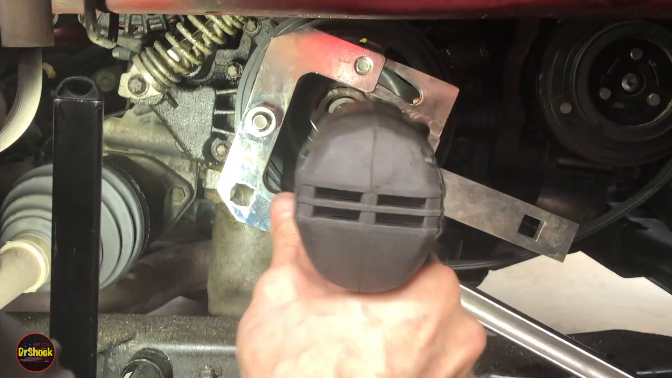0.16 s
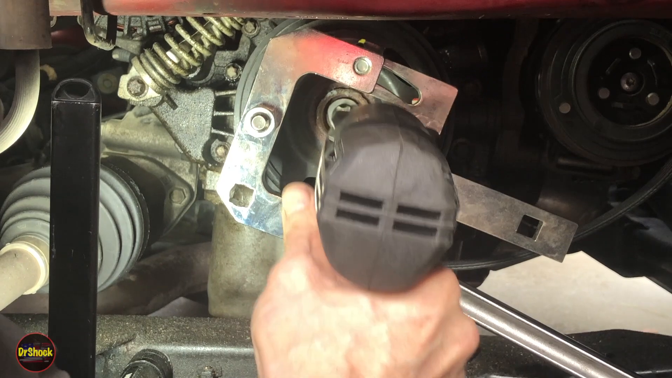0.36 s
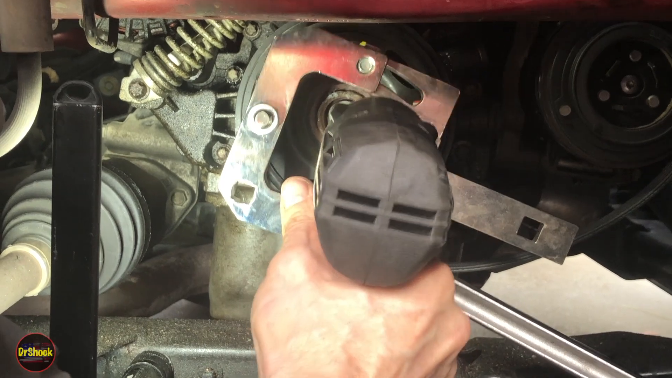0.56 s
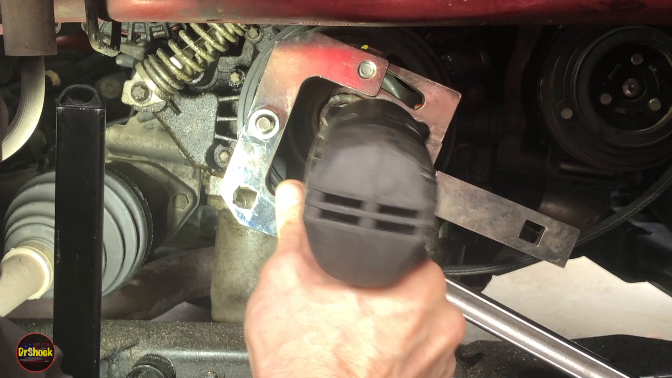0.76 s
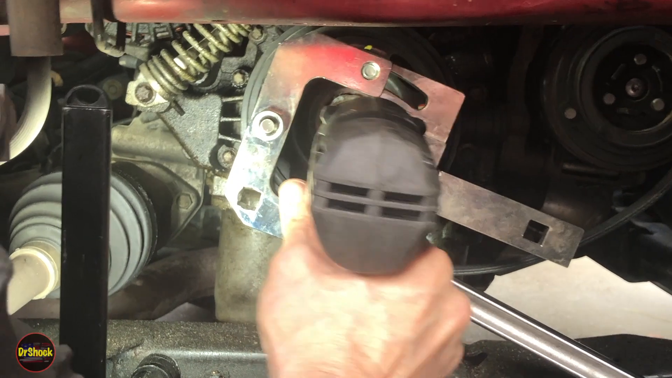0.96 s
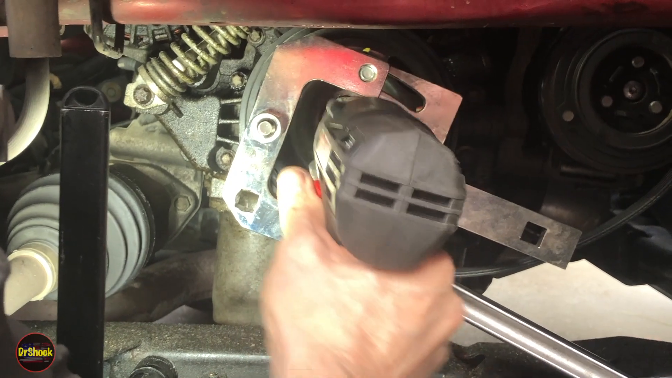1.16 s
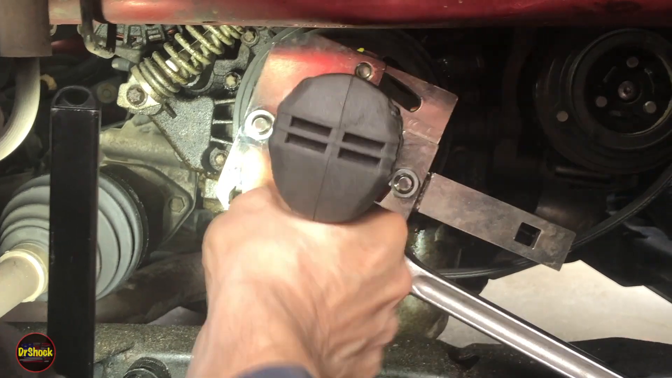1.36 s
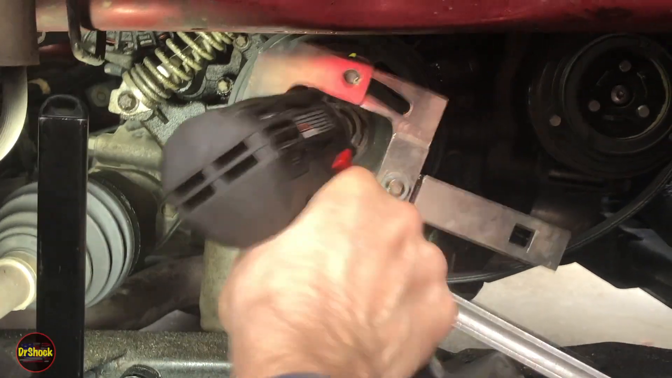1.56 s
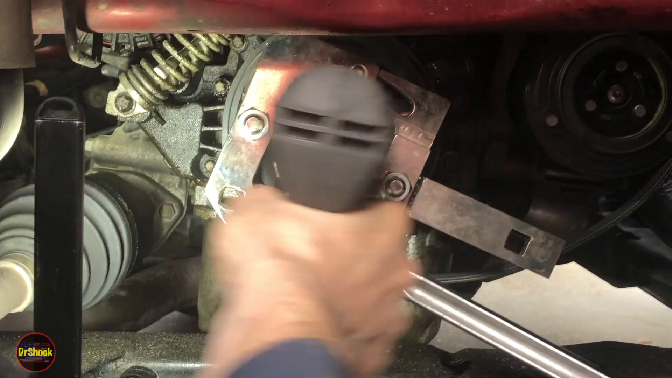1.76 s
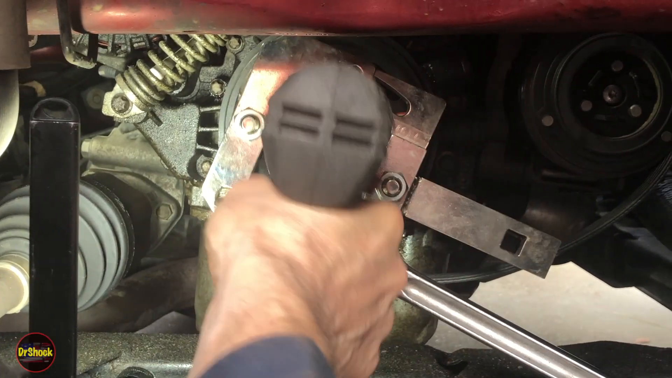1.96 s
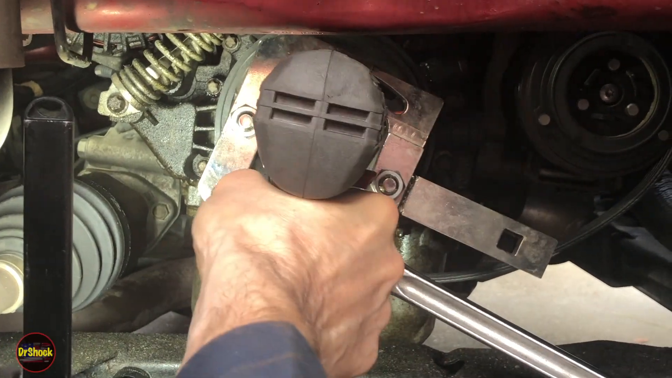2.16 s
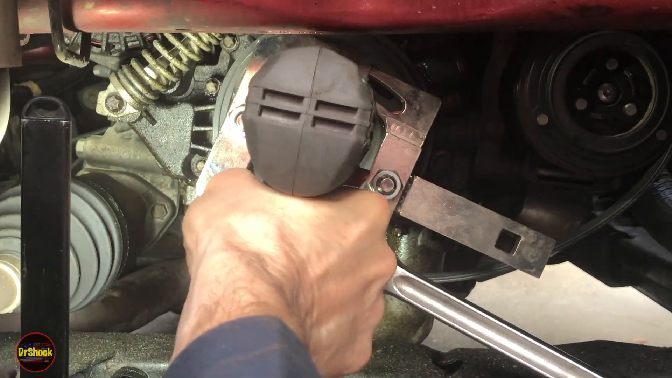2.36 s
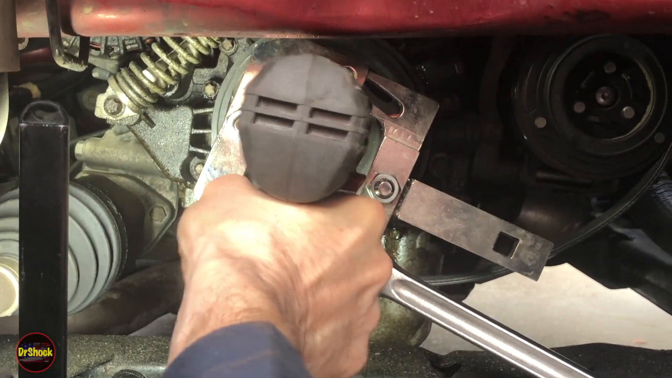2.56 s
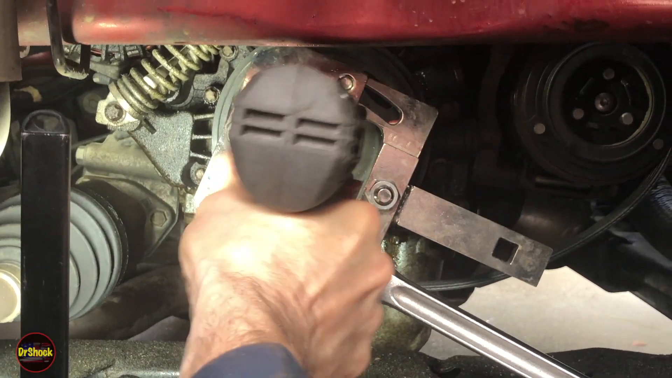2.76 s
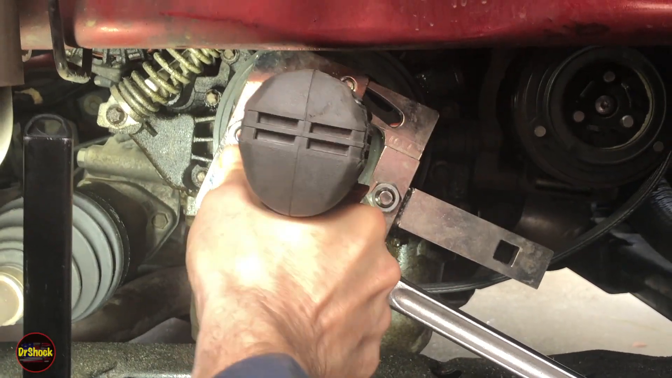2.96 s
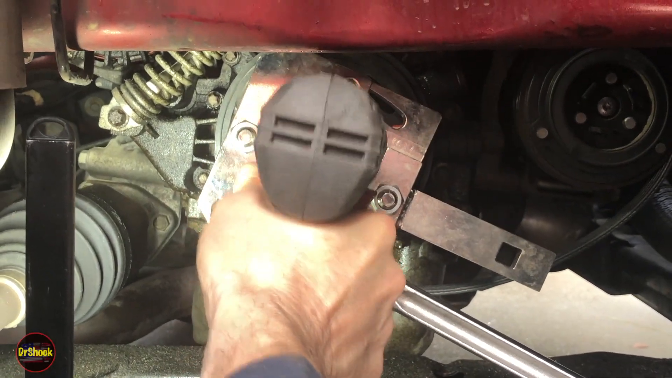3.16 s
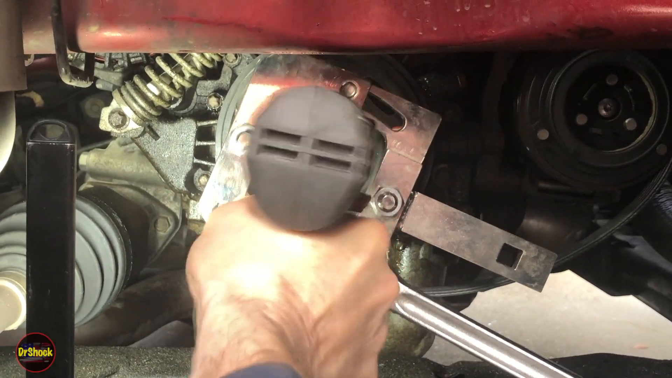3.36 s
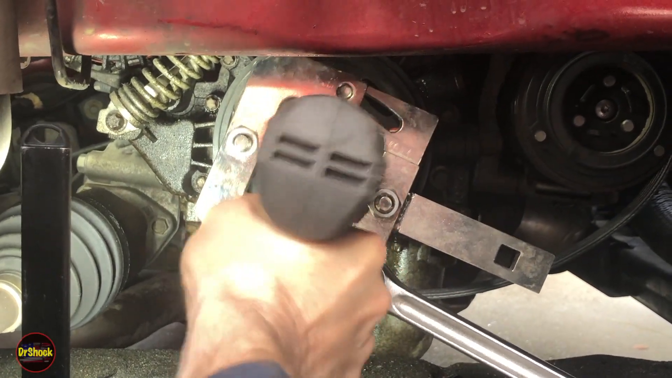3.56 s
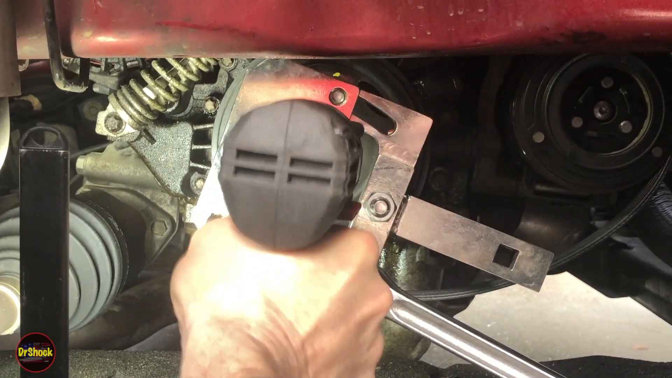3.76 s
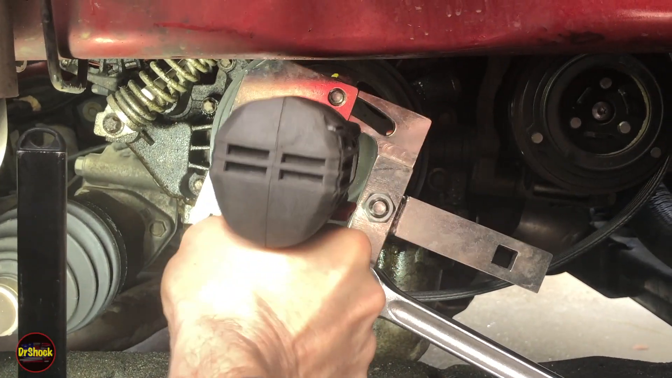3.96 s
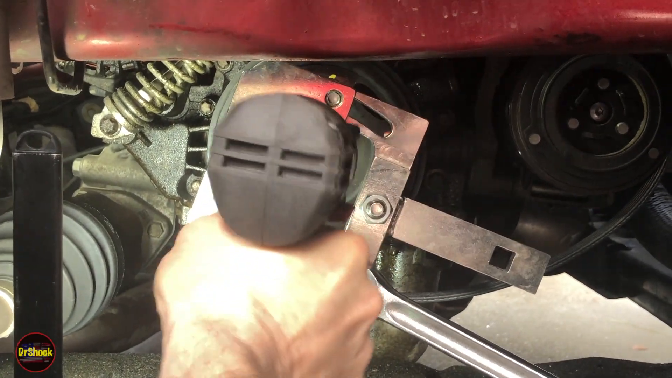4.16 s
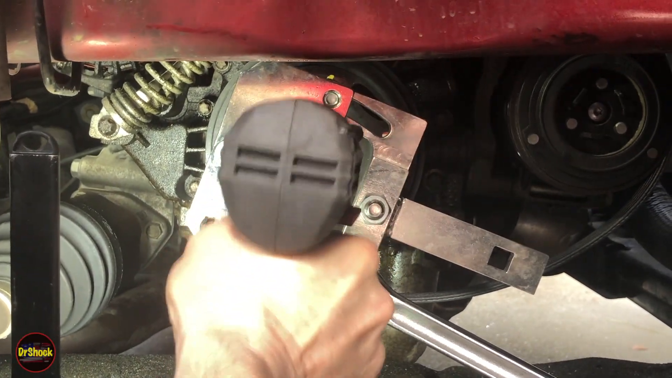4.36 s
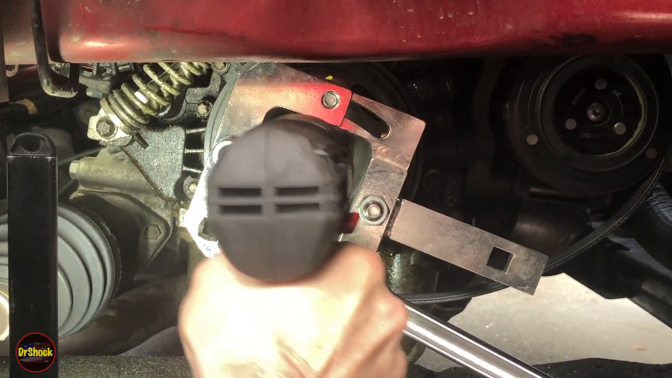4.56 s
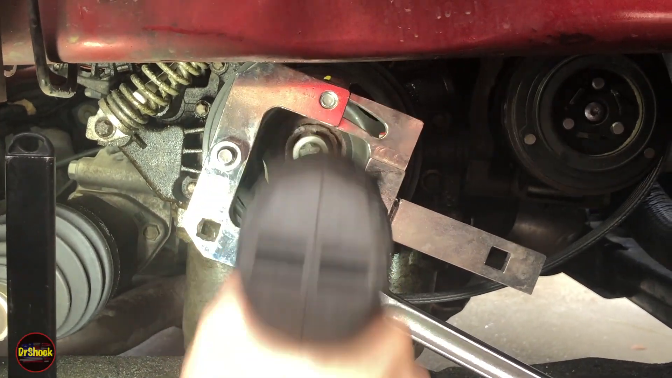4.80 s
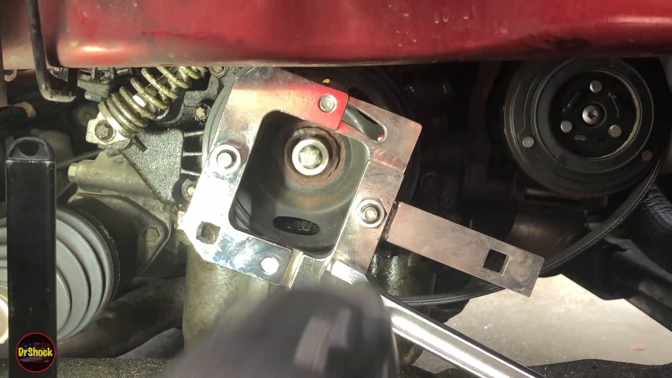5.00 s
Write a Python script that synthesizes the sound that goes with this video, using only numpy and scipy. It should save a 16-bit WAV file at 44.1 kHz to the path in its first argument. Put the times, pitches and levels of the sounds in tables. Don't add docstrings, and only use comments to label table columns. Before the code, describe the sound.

Socket knocks and sleeve rustle, then a cordless impact wrench hammers loose a bolt in a rapid burst, whines up, stops, and spins again.

```python
import sys
import numpy as np
from scipy import signal
from scipy.fft import rfft, irfft, next_fast_len
from scipy.io import wavfile
from scipy.ndimage import uniform_filter1d

SR = 44100
rng = np.random.default_rng(int(sys.argv[2]) if len(sys.argv) > 2 else 0)


def master(y):
    cut = np.clip(np.atleast_2d(y).T, -1, 1)
    pcm = np.round(cut * 32767)
    wavfile.write(sys.argv[1], SR, pcm.astype(np.int16))


def ratio_of_db(decibels):
    return 10 ** (np.asarray(decibels, float) / 20)


N = 221965

EDGES = 20 * 2 ** np.arange(0, 9.7, 1 / 3)
CENTRES = np.sqrt(EDGES[1:] * EDGES[:-1])
# start in seconds, peak in dB, loudest ring in Hz.
BLOWS = [(3.4083, -3, 2830), (3.434, 0.5, 1790), (3.4577, -0.5, 2400), (3.478, -1, 2840), (3.499, 1, 2910),
         (3.518, 1.5, 3660), (3.5385, -0.5, 5470), (3.559, -1.5, 4500), (3.5816, -2, 2700),
         (3.6033, -3, 2420), (3.6235, -2, 2860), (3.6435, -5, 1950)]
# motor bites [s], squeeze [dB per s], brake [s], rotor stops [s].
PULLS = [
    (3.408, 530, 3.876, 3.901),
    (4.03, 800, 4.503, 4.539),
]
# runs free from [s], share of top speed there [0-1], time constant [s].
SPINS = [
    (3.67, .7, .11),
    (4.03, .35, .069),
]


def rms_one(x):
    return x / np.sqrt(np.mean(x ** 2, axis=-1, keepdims=True) + 1e-20)


def at_hz(points, hz):
    table_hz, values = np.array(points)[:, 0], np.array(points)[:, 1]
    return np.interp(np.log(hz), np.log(table_hz), values)


def drift(rate, depth_db, count=1):
    r = np.exp(-80 * np.pi * rate / SR)
    noise = rng.standard_normal((count, N // 40 + 2002))
    smooth = signal.lfilter([1], [1, -2 * r, r * r], noise)[:, 2000:]
    slow = ratio_of_db(depth_db * rms_one(smooth))
    joined = slow[:, :-1, None] + np.diff(slow)[:, :, None] * np.arange(40) / 40
    return joined.reshape(count, -1)[:, :N]


def ring(clicks, hz, t60):
    r, w = ratio_of_db(-60 / (max(t60, .002) * SR)), 2 * np.pi * hz / SR
    return signal.lfilter([0, np.sin(w)], [1, -2 * r * np.cos(w), r * r], clicks + 1e-18)


def bank(source):
    bands = []
    for k, (low, high) in enumerate(zip(EDGES, EDGES[1:])):
        sos = signal.butter(2, [low, high], "band", fs=SR, output="sos")
        bands.append(signal.sosfilt(sos, source[k % 2]))
    return np.array(bands)


def coloured(bands, spectrum, patchy_db, rate):
    gains = ratio_of_db(at_hz(spectrum, CENTRES))
    heard = gains > gains.max() / 300
    flicker = drift(rate, patchy_db, count=heard.sum())
    return rms_one(gains[heard] @ (flicker * bands[heard]))


def add(out, bands, s, peak_db, band_db, t60, rise_s, crack=0):
    i = round(s * SR)
    t = np.arange(min(SR // 9, N - i)) / SR
    swell = 1 - np.exp(-t / (rise_s + 0.026 / CENTRES[:, None]))
    decay = np.exp(-np.log(1000) * t / t60[:, None])
    burst = ratio_of_db(band_db) @ (swell * decay * bands[:, i:i + len(t)])
    burst = burst * (1 + crack * np.exp(-t / 0.0017))
    out[i:i + len(t)] += ratio_of_db(peak_db) * burst / np.max(np.abs(burst))


def struck(table, modes, level_db, spread_db):
    at, out = [round(row[0] * SR) for row in table], np.zeros(N)
    peaks_db = np.array(table)[:, 1]
    chance = rng.standard_normal((len(at), len(modes), 2))
    for k, (hz, mode_db, t60) in enumerate(modes):
        strength = ratio_of_db(peaks_db + mode_db + level_db + spread_db * chance[:, k, 0])
        clicks = np.zeros(N)
        clicks[at] = strength * np.sign(chance[:, k, 1])
        out += ring(clicks, hz, min(t60, .085))
    return out


def parts(table):
    out, t = np.zeros(N), np.arange(SR // 8) / SR
    swell = 1 - np.exp(-t / .0008)
    for s, hz, level_db, t60 in table:
        i = round(s * SR)
        decay = ratio_of_db(level_db - 60 * t / max(t60, .005))
        out[i:i + len(t)] += decay * swell * np.sin(2 * np.pi * hz * t)
    return out * drift(160, 4.0)[0]


def sleeve():
    # start in seconds, held for seconds, rustle in dB,
    # swish above the rustle in dB.
    moves = [(0, 0.016, -61.5, 2), (.1, 0.2, -66, -2), (.4, 0.26, -76, -4), (.95, 0.011, -64, -9),
             (1.07, .3, -71.5, -16), (1.4, .01, -63.5, -4.5), (1.56, 0.15, -57.5, -22),
             (1.8, .55, -78.5, -2), (2.03, 0.067, -71.5, -5), (2.5, .75, -84, 2.5),
             (2.85, 0.0091, -71, -13), (3.298, .1, -74.5, -14.5), (4.5, 0.11, -63, -6),
             (4.9, 0.16, -60, -17)]
    swell_db_per_s, fade_db_per_s = 120, 199.5
    swish_rest_db = -81.5
    t = np.arange(N) / SR
    rustles, swishes = [], []
    for s, held, level_db, swish_above_db in moves:
        before, after = np.maximum(s - t, 0), np.maximum(t - s - held, 0)
        shape = level_db - swell_db_per_s * before - fade_db_per_s * after
        rustles.append(shape)
        swishes.append(shape + swish_above_db)
    return np.max(rustles, axis=0), np.max(swishes, axis=0).clip(swish_rest_db)


def background(bands):
    # frequency in Hz, level in dB per Hz.
    rumble_colour = [(12, -42), (20, -14), (70, -0.5), (145, -3), (250, -14.5), (528, -18.5), (1180, -26),
                     (1700, -38.5), (1920, -25), (2500, -34), (3250, -62), (5500, -120)]
    # frequency in Hz, level in dB per Hz.
    rustle_colour = [(180, -32.5), (300, -3), (730, -7.5), (975, -12), (1050, -10.5), (1820, -7.5),
                     (2260, -15), (2620, -11), (6000, -28.5), (7800, -48.5), (13200, -120)]
    # frequency in Hz, level in dB per Hz.
    swish_colour = [(2350, -27), (4000, -0.5), (6070, -10), (6470, -1), (7400, -4), (12400, -6.5),
                    (16000, -15.5)]
    hiss_db = -85
    rustle_db, swish_db = sleeve()
    rumble_db = -61 + 0.12 * np.maximum(rustle_db + 80.5, 0)
    rumble = ratio_of_db(rumble_db) * coloured(np.roll(bands, N // 3, axis=1), rumble_colour, 2.2, 8)
    moved, grain = np.roll(bands, N // 2, axis=1), drift(25, 0.5)[0]
    rustle = ratio_of_db(rustle_db) * coloured(moved, rustle_colour, 1.8, 14)
    swish = ratio_of_db(swish_db) * coloured(moved, swish_colour, 1.5, 15)
    return rumble + grain * (rustle + swish) + ratio_of_db(hiss_db) * rng.standard_normal(N)


def contacts(bands, table, rise_s, crack, ring_db):
    # frequency in Hz, level in dB per Hz.
    knock_colour = [(100, -16), (300, -17), (600, -8), (1500, 2.5), (3000, 4), (5000, 1), (9000, -3.5),
                    (16000, -11.5)]
    # frequency in Hz, time to fall 60 dB in seconds.
    knock_decay = [(300, 0.052), (790, 0.07), (2090, 0.04), (5510, 0.041)]
    plate_hz = 526
    out = np.zeros(N)
    treble = np.clip(np.log2(CENTRES / 3000), 0, 1)
    bass = np.clip(np.log2(1000 / CENTRES), 0, 1)
    click = np.arange(4000) == 0
    for s, peak_db, hz, weight, factor in table:
        treble_db, bass_db = -2 - 32.5 * weight, -32.5 + 33.5 * weight
        hollow_db = 5.5 * np.exp(-(np.log2(CENTRES / hz) / 0.48) ** 2)
        tilt_db = treble * (treble_db + 14.5) + bass * (bass_db + 24.5)
        colour_db = at_hz(knock_colour, CENTRES) + tilt_db + hollow_db
        t60 = at_hz(knock_decay, CENTRES) * np.clip(factor, .3, 4)
        add(out, bands, s, peak_db + 0.029, colour_db, t60, rise_s, crack)
        i = round(s * SR)
        out[i:i + 4000] += ratio_of_db(peak_db + ring_db) * ring(click, hz, .024)
        out[i:i + 4000] += ratio_of_db(peak_db + ring_db + bass_db - 0.5) * ring(click, plate_hz, 0.094)
    return out


def knocks(bands):
    # start in seconds, peak in dB, main ring in Hz,
    # weight from 0 thin to 1 heavy, length factor.
    scuffs = [(0.018, -46.5, 3330, 0.57, 4.8), (0.305, -44, 1920, 0.46, 0.86), (0.312, -51, 1060, 1, 0.65),
              (1.149, -29, 1600, 0.74, 1), (1.174, -41.5, 1570, 1, 2.5), (1.412, -46.5, 1430, 0.48, 2.8),
              (1.583, -25.5, 1500, 0.59, 1.9), (1.589, -25, 2700, 0.66, 3.1), (1.624, -40, 1640, 0.82, 3.4),
              (1.662, -28.5, 1240, 0.65, 1.6), (2.499, -52, 4020, .49, 1.3),
              (2.542, -48.5, 810, 0.57, 0.67), (2.718, -51.5, 1740, 0.35, 1.3),
              (3.997, -52.5, 4030, .4, 3.6), (4.009, -40.5, 2000, .6, 3)]
    # start in seconds, peak in dB, main ring in Hz, weight 0-1.
    grip_ticks = [(0.361, -51.5, 2230, 0.17), (0.554, -54.5, 1930, 0.86), (0.646, -56, 2240, 0.3),
                  (0.689, -55.5, 824, 1), (1.8, -55, 1850, .64), (1.994, -53.5, 566, 1.06),
                  (2.234, -58, 1010, 0.8), (2.259, -64, 630, 1), (2.324, -59.5, 958, 1),
                  (2.627, -57, 4030, 0.65), (2.648, -54.5, 4130, 0.4), (2.948, -61, 1780, .52),
                  (2.974, -54, 2670, 0.4), (3.199, -59, 2200, 0.3), (3.255, -58, 905, 0.5),
                  (4.691, -54, 1390, 0.5)]
    # start in seconds, peak in dB, main ring in Hz,
    # weight from 0 thin to 1 heavy, length factor.
    socket_knocks = [(0.95, -19, 2290, 0.64, 1.67), (1.106, -35.5, 4840, 0.49, 1.4),
                     (1.153, -30.5, 1930, 0.29, 1.8), (1.195, -33, 1520, 0.69, 2),
                     (1.313, -40.5, 1160, 0.95, 2.1), (1.6085, -13, 1170, 0.67, 1.3),
                     (1.712, -22.5, 1460, 0.63, 2), (1.746, -41, 1540, .98, 3.1),
                     (1.823, -50, 1800, 0.58, .66), (2.524, -42.5, 1570, 0.23, 2.4),
                     (2.826, -38.5, 1400, 0.48, 1.5), (2.873, -47.5, 1580, 0.58, 0.84),
                     (3.084, -31.5, 3060, 0.022, 1.2), (3.336, -48, 4200, 0.82, 1.4),
                     (3.355, -48.5, 4800, 1, 1.2)]
    # start in seconds, peak in dB, main ring in Hz, weight 0-1.
    grazes = [(1.016, -50.5, 1600, 0.95), (1.259, -57, 1700, .55), (1.386, -56, 2200, 0.4),
              (1.453, -57, 2100, 0.8), (1.468, -53, 2030, 0.76), (1.511, -52, 891, 1),
              (2.039, -64, 2500, 0.6), (2.079, -59, 1970, .55), (2.477, -54.5, 1790, 0.4),
              (2.736, -53, 1790, 0.84), (2.844, -72, 1500, .3), (3.104, -57, 840, 0.5)]
    # frequency in Hz, level in dB, time to fall 60 dB in seconds.
    socket_modes = [(917, -5.5, 0.028), (1361, -11.5, 0.068), (1520, 1, 0.053), (1790, -3.5, 0.052),
                    (2103, -5.5, 0.014), (2290, -3.5, 0.024), (2670, -6.5, 0.083), (2800, -5, 0.078),
                    (3240, -12.5, 0.035), (3600, -13.5, 0.045), (3800, -1, 0.041), (4140, -10, 0.043),
                    (4530, -12.5, 0.041), (5250, -4, 0.02), (5840, -17, .04), (6890, -17, 0.031)]
    tick_length, graze_length = 1.8, 1.4
    hard = socket_knocks + [row + (tick_length,) for row in grip_ticks]
    gliding = scuffs + [row + (graze_length,) for row in grazes]
    sharp = contacts(bands, hard, rise_s=.0004, crack=2.0, ring_db=-7)
    soft = contacts(bands, gliding, rise_s=.004, crack=0, ring_db=-20)
    rings = struck(hard, socket_modes, -21.0, 5.9) + struck(gliding, socket_modes, -22.0, 4.0)
    return sharp + soft + rings


def loose_parts():
    # start in seconds, pitch in Hz, level in dB,
    # time to fall 60 dB in seconds.
    knocked = [(.032, 3300, -52, .05), (.9503, 2720, -25, 0.016), (.951, 4900, -31.5, 0.033),
               (.951, 6140, -35, 0.032), (.951, 170, -43, 0.088), (1.107, 1685, -42, 0.028),
               (1.1065, 4880, -42, .015), (1.15, 2840, -43, .044), (1.154, 198, -47, 0.092),
               (1.196, 2350, -46, .04), (1.59, 4130, -33, .04), (1.59, 5300, -38, .04),
               (1.609, 3000, -21.5, 0.028), (1.609, 1700, -24, 0.022), (1.667, 2290, -36, .06),
               (1.665, 3630, -43, 0.079), (1.713, 975, -33, 0.077), (1.714, 2770, -37, .06),
               (1.714, 5190, -39, 0.045), (1.748, 2800, -52, .08), (1.75, 5250, -56, 0.05),
               (1.712, 1500, -29, 0.014), (2.075, 1960, -65, .1), (2.236, 900, -57.5, 0.035),
               (2.258, 600, -55, 0.045), (2.478, 1730, -61, 0.064), (2.628, 2550, -64, .08),
               (2.648, 3280, -66, .08), (2.718, 1750, -61, .07), (2.841, 1460, -54.5, 0.028),
               (2.841, 2600, -60, .03), (2.8735, 1620, -43, 0.026), (3.0845, 5020, -36.5, 0.017),
               (3.0845, 6920, -43, 0.018), (3.085, 9450, -44, 0.024), (3.086, 2480, -39, 0.018),
               (3.324, 1710, -57, 0.014), (3.336, 4113, -53.5, .012), (3.355, 4860, -50.5, .02),
               (3.879, 5400, -25.5, 0.04), (3.887, 4340, -23, 0.053), (3.886, 2520, -27, .04),
               (3.932, 3620, -60, .2), (3.085, 1610, -45.5, 0.028), (4.503, 3300, -23.5, 0.032),
               (4.501, 1760, -22.5, 0.032), (4.513, 5000, -29, 0.033), (4.504, 9530, -22, .04),
               (4.526, 1710, -31.5, 0.037), (4.535, 2490, -27, 0.038)]
    # start in seconds,
    # pitch in Hz, # level in dB, time to fall 60 dB in seconds.
    motor_rings = [(3.372, 2800, -50, .2), (3.368, 1500, -54.5, .2), (4.012, 2500, -48.5, .1),
                   (4.03, 2520, -27, 0.096), (4.034, 1750, -34, .06), (4.056, 2300, -38, .06),
                   (4.056, 4700, -29, .07), (4.066, 5150, -29, 0.054), (4.082, 5600, -35, .05),
                   (4.158, 4900, -38, .06), (4.502, 12000, -28, .04), (4.172, 13200, -34, .02),
                   (3.674, 10500, -28, .02)]
    return parts(knocked + motor_rings)


def chopper():
    # on in seconds, off in seconds, level in dB.
    touches = [
        (2.515, 2.655, -70),
        (3.336, 3.366, -71),
        (3.932, 3.991, -84),
    ]
    switch_hz = 7380
    t, on = np.arange(N) / SR, 0
    for start, stop, level_db in touches:
        times = [start, .6 * start + .4 * stop, stop, stop + 0.0038]
        on = on + ratio_of_db(level_db) * np.interp(t, times, [0, 1.4, 0.41, 0.033])
    tone = np.sin(2 * np.pi * switch_hz * t) + ratio_of_db(-19) * np.sin(4 * np.pi * switch_hz * t)
    return on * drift(12, 2.5)[0] * tone


def hammer(bands):
    # start in seconds, peak in dB, loudest ring in Hz.
    cam = [(3.3938, -17, 2535), (3.400, -8, 1520), (3.405, -4, 2850), (3.4201, -9.5, 1592),
           (3.428, -6, 1620), (3.445, -8.5, 1594), (3.4726, -7, 2790), (3.4846, -8, 2848),
           (3.493, -6, 1767), (3.512, -9, 1600), (3.530, -8, 1583), (3.5516, -5, 1607), (3.566, -8, 2600),
           (3.576, -12.5, 1600), (3.587, -8, 3013), (3.597, -11, 2300), (3.61, -10, 1997),
           (3.618, -7, 2394), (3.6368, -5.5, 1820), (3.650, -10.5, 2440), (3.659, -14, 1600),
           (3.672, -11.5, 2806), (3.684, -21.5, 2820)]
    # frequency in Hz, level in dB,
    # time to fall 60 dB in seconds.
    steel = [(507, -16, .08), (1300, -16, 0.078), (1535, -6, .06), (1629, -3.5, 0.095), (1778, -1.5, 0.093),
             (1995, -9, 0.052), (2375, -1.5, .06), (2650, -3.5, 0.07), (2840, 2.5, 0.071),
             (3184, -10, 0.054), (3680, -3, .06), (4400, -6, 0.074), (5470, -11, 0.037), (11000, -6, .03)]
    # frequency in Hz, level in dB per Hz.
    blow_colour = [(15, -38), (25, -7.5), (74, -7), (161, -12.5), (242, -7.5), (354, -23.5), (503, -4),
                   (1130, -7), (1650, 2), (2840, -2.5), (3430, -6.5), (3720, -0.5), (6560, -9.5),
                   (11300, -9), (16000, -18)]
    # frequency in Hz, time to fall 60 dB in seconds.
    blow_decay = [(30, .1), (300, .085), (1500, .057), (4000, .056), (10000, .07)]
    out = struck(BLOWS, steel, -15, 4.0) + struck(cam, steel[1:10], -16, 4.0)
    treble = np.clip(np.log2(CENTRES / 3500), 0, 1)
    colour_db, decay = at_hz(blow_colour, CENTRES), at_hz(blow_decay, CENTRES)
    for s, peak_db, _ in BLOWS:
        treble_db = 0.5 - 10 * (s - BLOWS[0][0])
        add(out, bands, s, peak_db + 6.5, colour_db + treble * treble_db, .75 * decay, rise_s=.0006)
    for s, peak_db, _ in cam:
        dull_db = max(18.5 - 60.5 * (s - cam[0][0]), 6.0)
        add(out, bands, s, peak_db, colour_db - dull_db * treble, .45 * decay, rise_s=.0008)
    ring_s = .022
    blow_rings = parts([(s, hz, peak_db - 6, ring_s) for s, peak_db, hz in BLOWS])
    cam_rings = parts([(s, hz, peak_db - 4, ring_s) for s, peak_db, hz in cam])
    return out + blow_rings + cam_rings


def rotor(pull, spin):
    top_mesh_hz, let_go_s, sag_hz = 3915, .05, 200
    brake = pull[2]
    free_from, start_share, time_constant = spin
    t = np.arange(N) / SR
    eased = np.clip((t - brake) / let_go_s + 1, 0, 1) ** 2
    missing = (1 - start_share) * np.exp(-np.maximum(t - free_from, 0) / time_constant)
    return 1 - missing - eased * sag_hz / top_mesh_hz


def effort(top_db, follows, shaken_db, stop_rate, echo_db, echo_rate, lag_s):
    first_share, grows_s, fade_s = .55, .1, 0.072
    t, out = np.arange(N) / SR, 0
    first, last = BLOWS[0][0], BLOWS[-1][0]
    shaken = np.interp(t, [first - .012, first, first + grows_s, last, last + fade_s],
                       [0, first_share, 1, 1, 0])
    for pull, spin in zip(PULLS, SPINS):
        bite, squeeze, _, stop = pull
        rise = squeeze * np.minimum(t - bite - lag_s, 0)
        after = np.maximum(t - stop, 0)
        fall = np.maximum(-stop_rate * after, echo_db - echo_rate * after)
        out = out + rotor(pull, spin) ** follows * ratio_of_db(top_db + shaken_db * shaken + rise + fall)
    return out


def gear_ticks():
    hits = rng.random((2, N)) < 4000 / SR
    strength = ratio_of_db(2.0 * np.minimum(rng.exponential(1, (2, N)), 4))
    return hits * strength * rng.choice([-1, 1], (2, N))


def gears(ticks):
    # frequency in Hz, level in dB per Hz.
    rattle_colour = [(18, -55.5), (30, -28), (230, -20), (380, -25), (544, -5.5), (748, -16), (801, -10),
                     (1130, -7.5), (1260, -6), (1780, -2), (3650, -4), (4440, -6), (7000, -23),
                     (9100, -53.5), (15400, -120)]
    # frequency in Hz, width in Hz, level in dB.
    housing = [(1560, 160, -13), (1740, 260, -13), (2450, 200, -9), (3060, 90, -13), (541.6, 60, -8.5)]
    # level at top speed in dB, dB per dB of speed, dB added by the blows,
    # stop in dB per second, echo in dB, echo fade in dB per second.
    gear_law = (-28, 1.02, 10.5, 881, -14.5, 328)
    rattle = coloured(bank(ticks), rattle_colour, 2.0, 30)
    shell = sum(ratio_of_db(level_db) * rms_one(ring(ticks[0], hz, 2.4 / width)) for hz, width, level_db in housing)
    return effort(*gear_law, lag_s=-.004) * rms_one(rattle + 0.33 * shell)


def fan(bands, ticks):
    # frequency in Hz, level in dB per Hz.
    air_colour = [(2940, -21.5), (5000, 1), (5840, -6.5), (7860, -1), (8920, -4.5), (10500, 2.5),
                  (12000, -5.5), (14200, -13.5), (15400, -11.5), (16000, -16)]
    # frequency in Hz, width in Hz, level in dB.
    vents = [(6770, 140, -1.5), (7640, 95, -1.5), (8070, 58, -3), (8620, 80, -7), (9800, 52, -2.5),
             (10400, 110, 1.5), (11100, 230, -3)]
    # level at top speed in dB, dB per dB of speed, dB added by the blows,
    # stop in dB per second, echo in dB, echo fade in dB per second.
    fan_law = (-34, 1.5, 14.5, 1250, -24, 220)
    slots = 0
    for hz, width, level_db in vents:
        slots = slots + ratio_of_db(level_db) * rms_one(ring(ticks[1], hz, 3.2 / max(width, 60)))
    air = coloured(bands[:, ::-1], air_colour, 1.1, 30) + 0.39 * rms_one(slots)
    return effort(*fan_law, lag_s=.004) * rms_one(air)


def whine(pull, spin, mesh, sides):
    # frequency in Hz, level in dB.
    case = [(800, -16), (1300, -3), (1800, 0), (2100, -4), (2450, 2), (2800, -3), (3100, 1), (3350, -2.5),
            (3650, -3), (3900, -2), (4300, -6), (5000, 6), (5600, 3), (6200, -6), (7200, 4), (7800, 2)]
    t, (s, hz, level_db) = np.arange(N) / SR, np.transpose(mesh)
    free_from, brake = spin[0], pull[2]
    on = np.interp(t, [free_from - .01, free_from, brake - .004, brake + 0.0019], [0, 1, 1, 0])
    pitch = uniform_filter1d(np.interp(t, s, hz), size=900)
    gaining = np.gradient(rotor(pull, spin)) * SR

    def chatter(cruise_db, gained_db, start):
        return ratio_of_db(cruise_db + gained_db * np.clip(gaining - start, 0, 1))

    above, below, fifth = chatter(-15, 11, 3.2), chatter(-2.5, 1.5, 2.1), chatter(-24, 23, 7.3)
    phase = 2 * np.pi * np.cumsum(pitch * drift(60, .025)[0]) / SR
    steady, broken = drift(60, 1.8, count=2), drift(70, 3, count=2) - .2
    upper, half = ratio_of_db(sides[0]), ratio_of_db(sides[1])
    lines = [(.5, half * below * steady[1]), (2, upper * above * broken[0]), (3 / 2, upper * fifth * broken[1])]
    tone = sum(gain * ratio_of_db(at_hz(case, k * pitch)) * np.sin(k * phase) for k, gain in lines)
    main = np.sqrt(2) * ratio_of_db(np.interp(t, s, level_db)) * steady[0] * np.sin(phase)
    return on * (tone + main)


def whines():
    # time in seconds, pitch in Hz, level in dB.
    meshes = [
        [(3.67, 2740, -30), (3.704, 3060, -31), (3.755, 3380, -37), (3.772, 3450, -29), (3.81, 3570, -35),
         (3.835, 3635, -26), (3.855, 3660, -28), (3.88, 3470, -34)],
        [(4.03, 1368, -44), (4.046, 1864, -39), (4.07, 2481, -35), (4.108, 3101, -34), (4.148, 3458, -34),
         (4.212, 3720, -33), (4.304, 3855, -30.5), (4.442, 3925, -35), (4.505, 3740, -30)],
    ]
    # upper partials in dB, half tone in dB.
    sides_db = [(-30, -28), (-38, -33)]
    return sum(map(whine, PULLS, SPINS, meshes, sides_db))


def clacks(bands):
    # start in seconds, peak in dB, ring in Hz.
    snaps = [
        (3.873, -20.5, 9440),
        (3.8814, -30.5, 8410),
        (4.174, -24.5, 12350),
        (4.5003, -16, 10200),
        (4.509, -23, 8320),
    ]
    out = np.zeros(N)
    colour_db = -5.0 * np.abs(np.log2(CENTRES / 7000))
    for s, peak_db, hz in snaps:
        add(out, bands, s, peak_db, colour_db, 0.04 + 0 * CENTRES, rise_s=.001)
        i = round(s * SR)
        out[i:i + 4000] += ratio_of_db(peak_db - 1.0) * ring(np.arange(4000) == 0, hz, 0.026)
    return out


def garage(x, t60):
    size = next_fast_len(N + SR)
    hz = np.arange(size // 2 + 1) * SR / size
    decay = t60 / (1 + hz / 6000)
    response = 0
    for k, lag in enumerate(rng.uniform(.012, .04, 10)):
        loop = ratio_of_db(-60 * lag / decay) * np.exp(-2j * np.pi * hz * lag)
        response = response + (-1) ** k * loop / (1 - loop)
    return irfft(rfft(x, size) * response, size)[:N]


def scene():
    bands = bank(rng.standard_normal((2, N)))
    ticks = gear_ticks()
    handling = knocks(bands) + loose_parts()
    motor = gears(ticks) + fan(bands, ticks) + whines() + clacks(bands)
    tool = handling + hammer(bands) + motor
    room = garage(tool, t60=.28)
    return (tool + ratio_of_db(-33) * room + chopper() + background(bands))[None]


def roll_off(x):
    return signal.sosfilt(signal.butter(12, 15850, fs=SR, output="sos"), x)


def record(dry):
    flat = dry / (1 + np.abs(dry / .57) ** 4) ** (1 / 4)
    low_pass = signal.ellip(10, .5, 60, 15850, fs=SR, output="sos")
    return roll_off(signal.sosfilt(low_pass, flat))


dry = scene()
out = record(dry)
master(out)
```